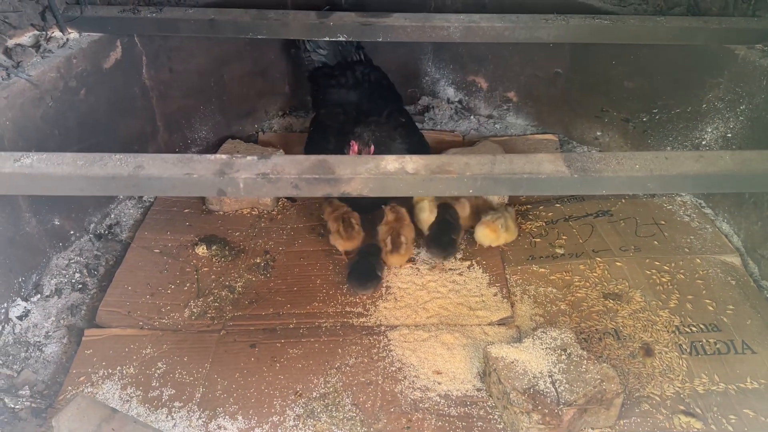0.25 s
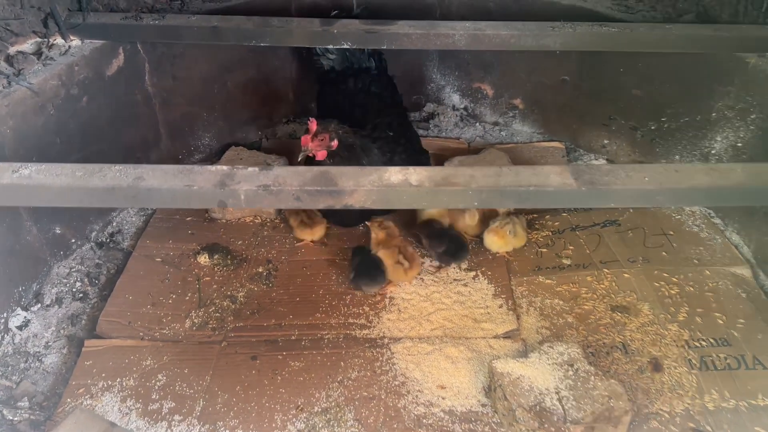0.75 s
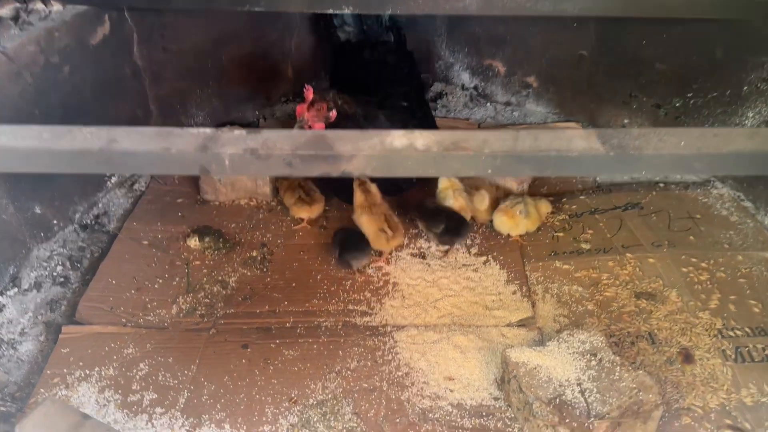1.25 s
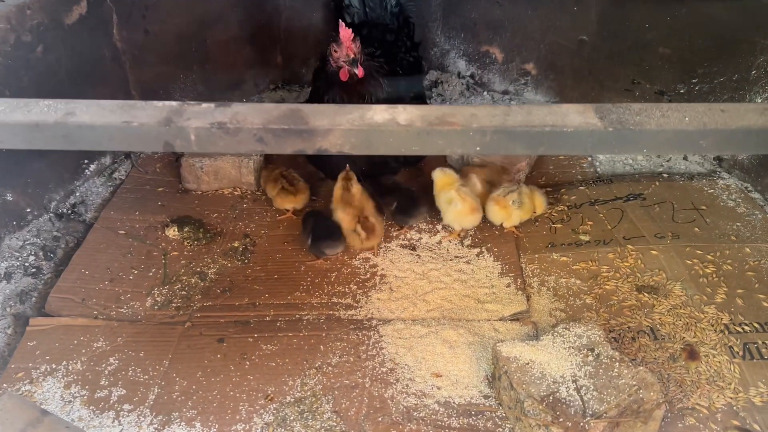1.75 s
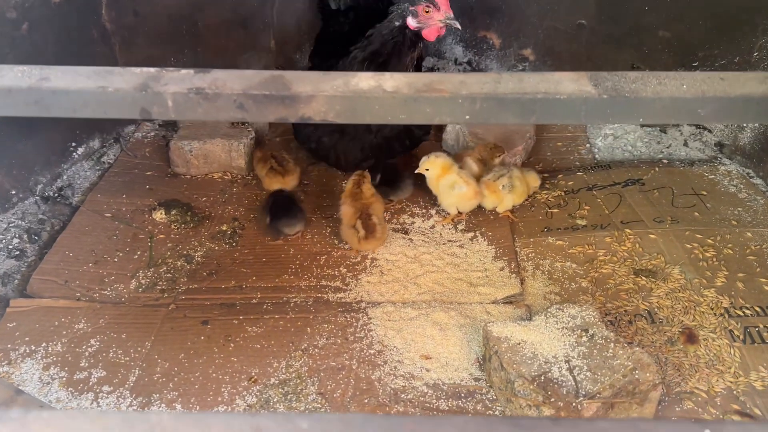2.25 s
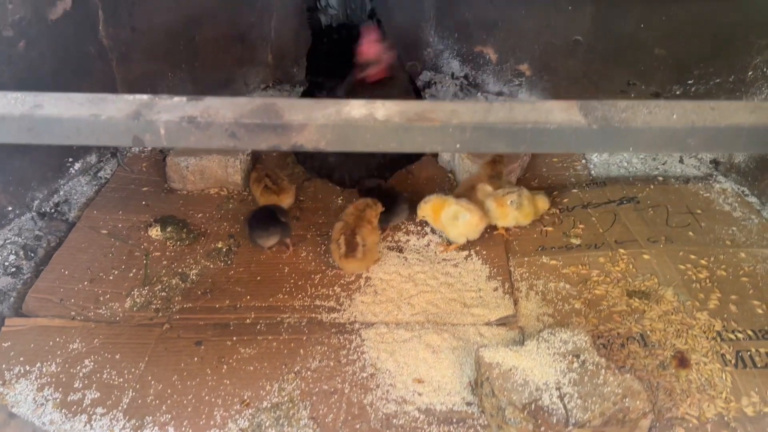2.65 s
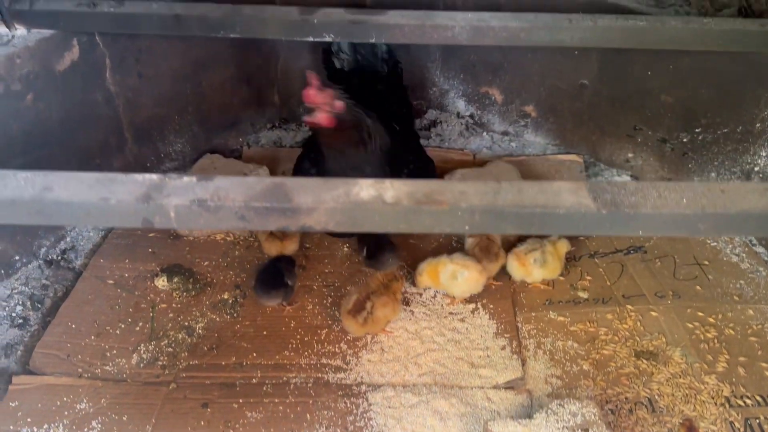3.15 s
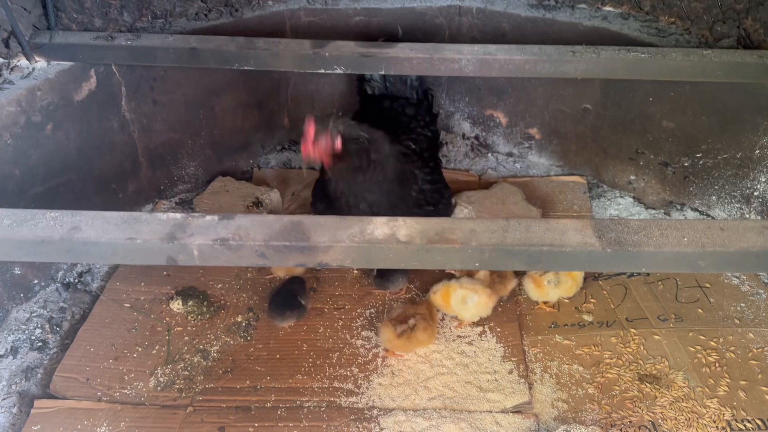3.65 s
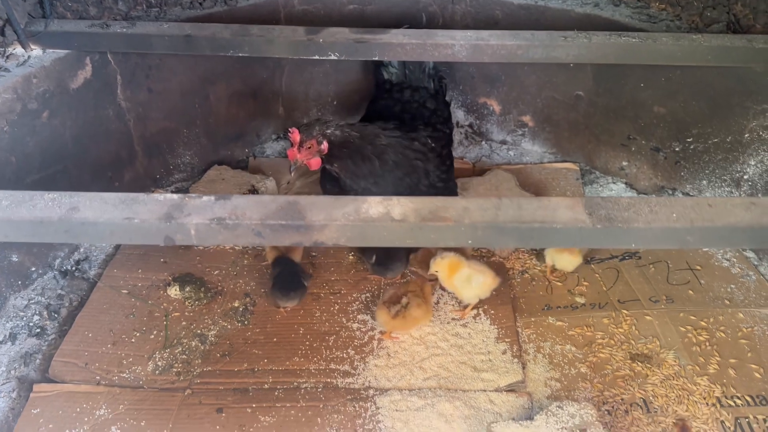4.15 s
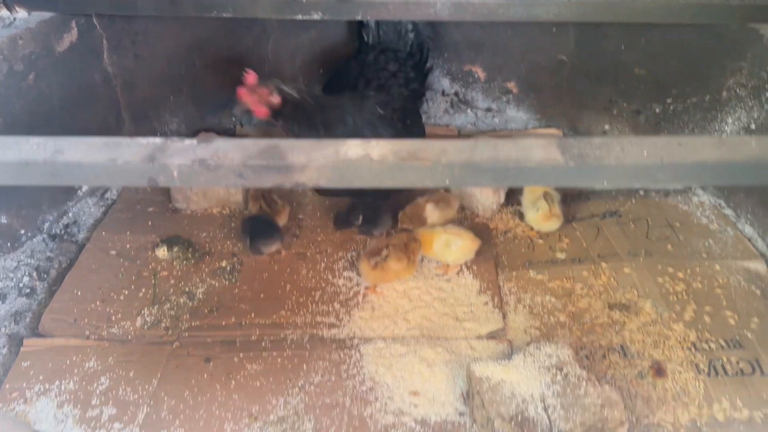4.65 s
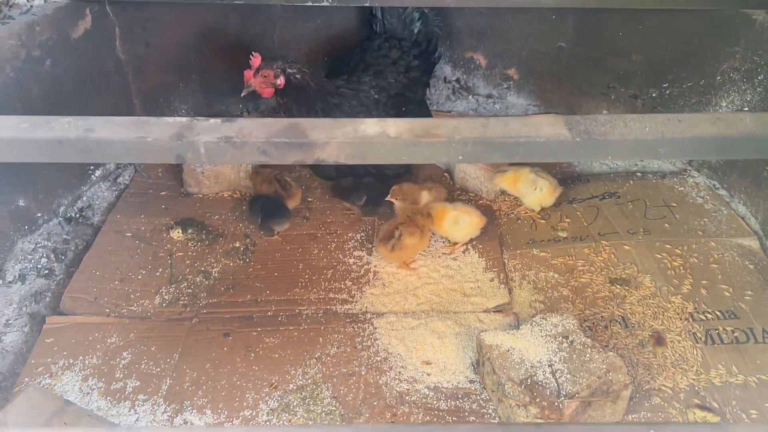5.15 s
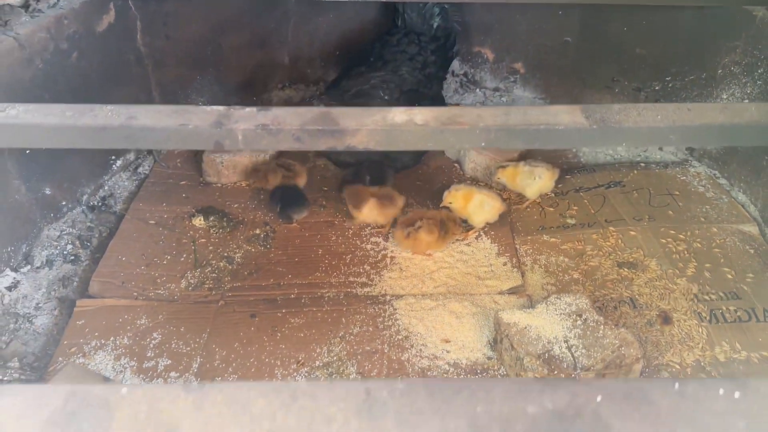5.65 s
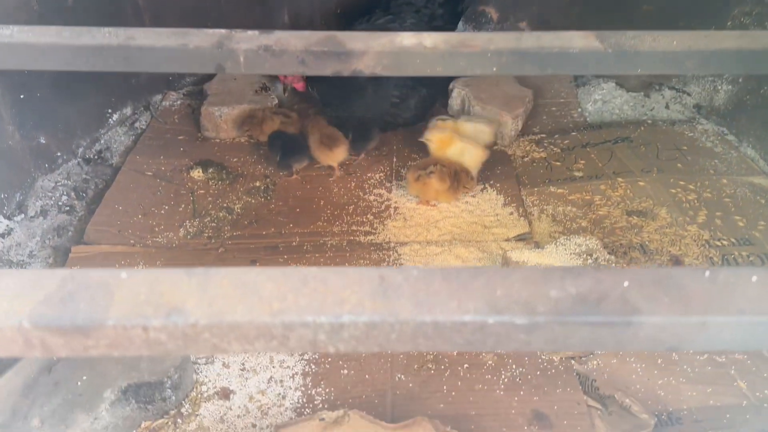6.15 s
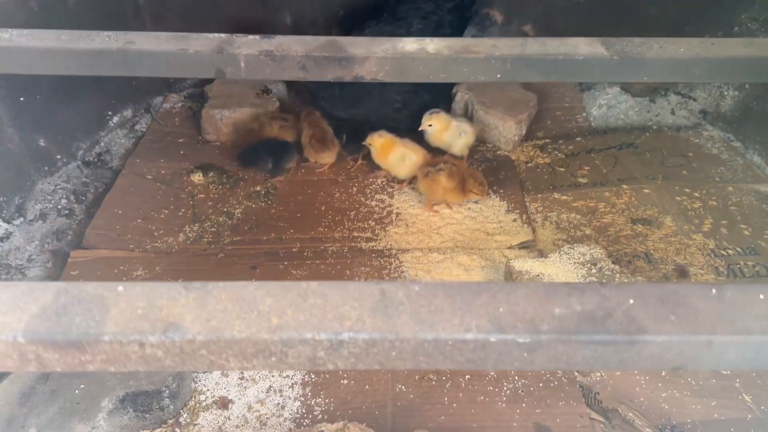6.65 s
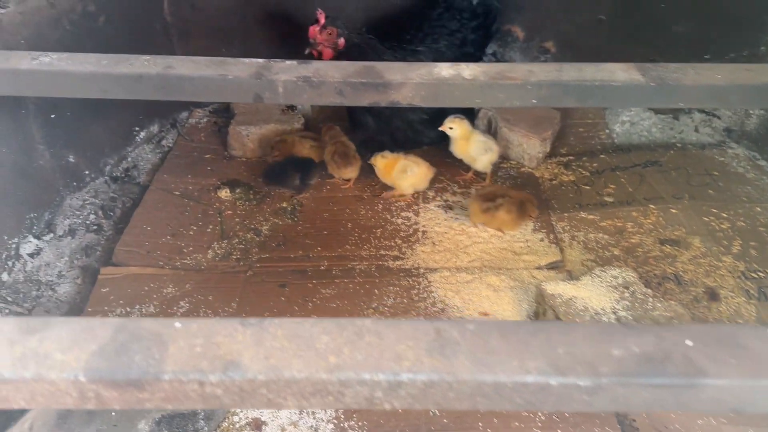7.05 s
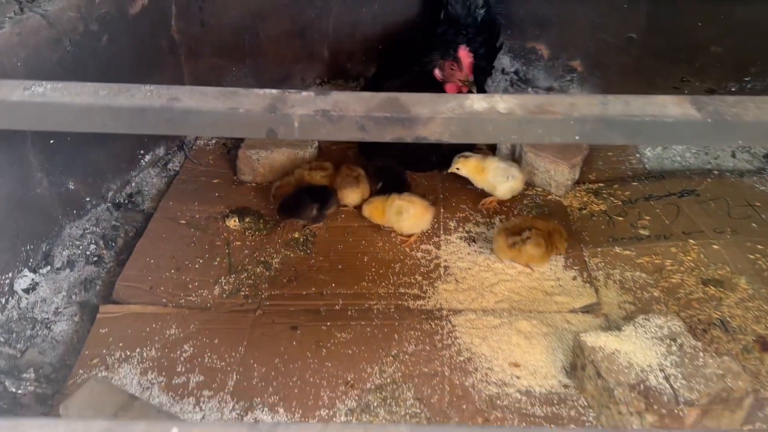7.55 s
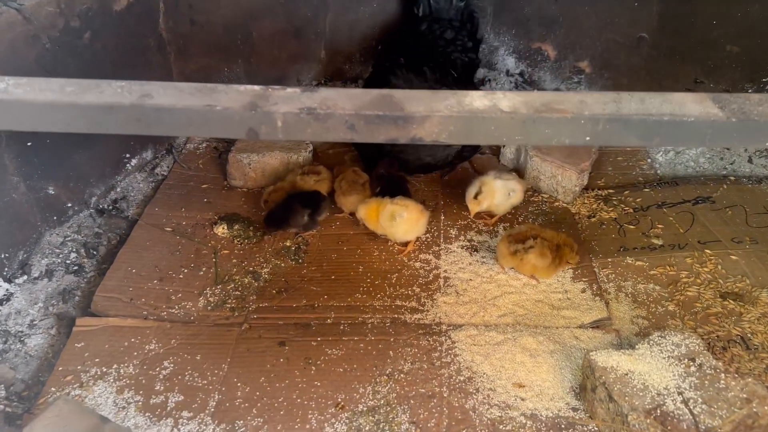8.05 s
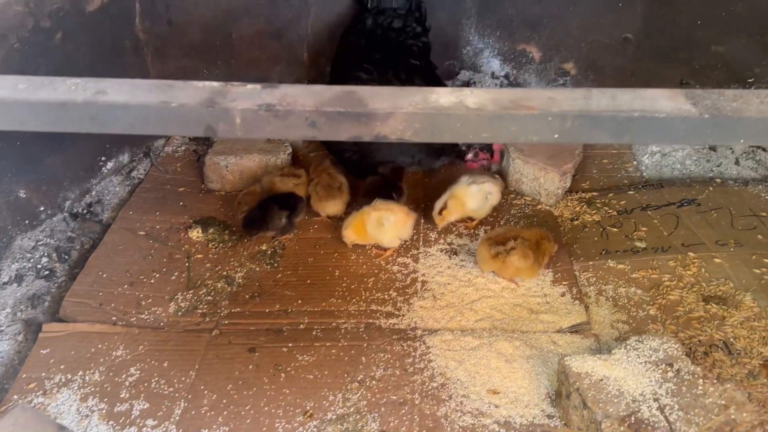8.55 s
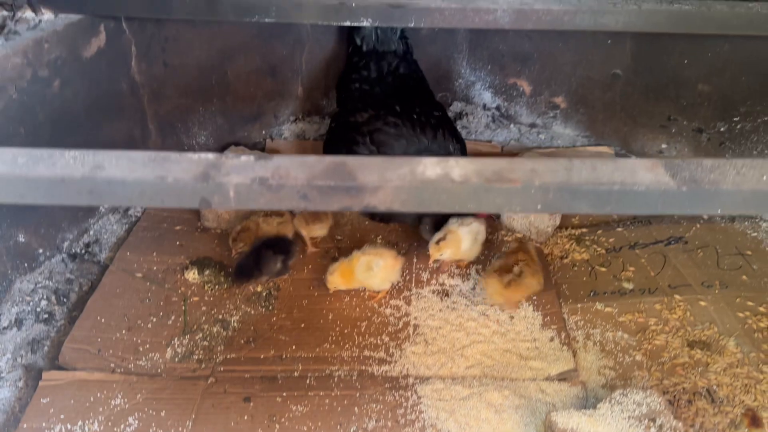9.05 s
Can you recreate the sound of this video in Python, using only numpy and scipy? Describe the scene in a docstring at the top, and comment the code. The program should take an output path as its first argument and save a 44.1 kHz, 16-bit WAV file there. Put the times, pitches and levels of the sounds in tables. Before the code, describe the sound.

Young chicks peep throughout in short, high, mostly rising whistles, heard from above an open pen. Their beaks and claws tick and scuff on dry grain, and their feet tap lightly on cardboard. From about two seconds in, a hen adds occasional soft, brief clucks. Distant traffic hisses and hums behind them, while wind rumbles on the microphone with a few low thumps, strongest near the middle.

```python
"""Far traffic hisses and hums throughout, with wind rumbling on the microphone ports (its openings).
Heard from above, beaks and claws tick and scuff on grain in an open pen floored with cardboard.
Chicks peep in short, mostly rising whistles, puffs of wind thump, and feet tap and bend the cardboard.
A hen clucks softly, her throat and chest shaping the tone. The pen's close walls add a short echo."""
import sys
import numpy as np
from scipy import signal
from scipy.fft import rfft, irfft, next_fast_len
from scipy.io import wavfile
from scipy.ndimage import uniform_filter1d

SR = 44100
rng = np.random.default_rng(int(sys.argv[2]) if len(sys.argv) > 2 else 0)


def unload_audio(sound):
    """Save the sound as a 16-bit wav file, at the path given as the first command line argument."""
    columns = np.transpose(np.atleast_2d(sound))
    # keep every value between -1 and 1, then stretch to whole-number steps
    steps = np.round(np.clip(columns, -1, 1) * 32767)
    wavfile.write(sys.argv[1], SR, steps.astype(np.int16))


N = 410130
FFT_SIZE = next_fast_len(N)
HZ = np.maximum(np.fft.rfftfreq(FFT_SIZE, 1 / SR), 1)
TICK_RISE_S = .002215

# How loud the background is: t/s, traffic level/dB, scuffing level/dB
BACKGROUND_LEVELS = [(0, -48.5, -56.5), (4, -46.5, -57), (9.3, -48, -62.5)]
# Tone of the traffic hiss: f/Hz, relative level/dB
TRAFFIC_TONE = [(150, -52), (230, -1.5), (500, 2), (1000, 2.5), (1470, 2.5), (1830, -3.5), (3400, -9),
                (6000, -11.5), (9000, -18.5)]
# Tone of the high rustle, with a narrow silent gap near 11.8 kHz, as in compressed audio:
# f/Hz, relative level/dB
RUSTLE_TONE = [(2000, 4.5), (5000, -8.5), (8400, -1), (9800, -7), (10400, -6.5), (11800, -89), (12500, -2),
               (16000, -11)]
# Wind on the ports: t/s, rumble level/dB, flutter level/dB
WIND_LEVELS = [(0, -49, -46.5), (.8, -52, -54.5), (1.2, -41.5, -50), (3.5, -48, -56.5), (4.1, -34, -38),
               (4.7, -55, -57.5), (5.6, -40.5, -49.5), (6.2, -57.5, -57), (7.2, -47.5, -53),
               (9.3, -40, -49)]
# Single puffs of wind: t/s, level/dB, f/Hz
WIND_PUFFS = [(0.876, -22, 97), (0.979, -29, 72), (3.85, -24.5, 89), (3.944, -13, 104.5),
              (3.971, -14.5, 157), (4.031, -17, 255), (4.056, -22, 148), (4.097, -21.5, 96),
              (4.377, -24, 99.4), (4.407, -21.5, 81), (5.807, -21.5, 100.5), (5.886, -21, 194),
              (5.915, -20.5, 183)]
# A far engine coming and going: t/s, level/dB
ENGINE_LEVELS = [(0, -63), (1, -46), (2.3, -55), (4.6, -50.5), (5.4, -44.5), (5.9, -39.5), (6.1, -57),
                 (6.8, -41), (7.6, -46), (8.2, -61)]
# The engine's tones: multiple of its pitch, relative level/dB
ENGINE_TONES = [(1, 0.5), (2, -12)]
# Beaks and claws hitting dry grain: t/s, level/dB, woody body against the treble/dB
GRAIN_TICKS = [(0.1018, -46, 7), (0.254, -38, -13), (0.9627, -35, -3), (0.9767, -32.5, -4.5),
               (1.0076, -23.5, -19), (1.1038, -26, -6), (1.279, -37.5, 3), (1.3697, -33, -4.5),
               (1.4163, -16, -17), (1.4608, -33, -7), (1.503, -32.5, -16), (1.9172, -22.5, -19),
               (2.0243, -37.5, 1), (2.0519, -29, -26), (2.2624, -36, -4), (2.11, -41, -26),
               (3.183, -27, -29), (3.362, -40, 0), (3.4233, -22.5, -13.5), (3.8376, -39.5, -2),
               (4.3285, -32.5, 1), (4.4205, -39, 5.5), (5.1303, -31.5, -4), (5.1923, -36.5, 0),
               (6.332, -32.5, -2), (6.795, -33, -13.5), (7.5948, -35, -2), (8.246, -28, -33),
               (8.6646, -21, -11), (8.7429, -30.5, -1.5), (8.791, -45, 10), (8.985, -35, -1),
               (9.001, -30, -6), (9.158, -33, -14)]
# Tone of the grain's crackle: f/Hz, relative level/dB
GRAIN_TONE = [(700, 6), (2000, 13.5), (4500, -2), (8500, 1), (11000, -10), (14500, -2), (16500, -4)]
# Claws dragged through the grain: t/s, level/dB, length/s
CLAW_DRAGS = [(0.953, -46, 0.093), (5.125, -46, 0.02), (8.47, -49, 0.3), (8.908, -46, 0.22)]
# Notes of pecked cardboard: f/Hz, woody body that rings it most/dB, time to fade by 60 dB/s
BOARD_NOTES = [(1100, 9, .035), (2100, -2, .04), (4400, -10, .025)]
# Peeps, each an opening that turns into a sweep: turn t/s, opening length/s, start f/Hz, turn f/Hz,
# tip f/Hz, sweep length/s, opening level/dB, sweep level/dB
CHICK_PEEPS = [(0.154, 0.024, 3250, 3370, 4380, 0.027, -50, -48),
               (0.295, 0.024, 3200, 3340, 3860, 0.014, -45.3, -46),
               (0.386, 0.029, 3100, 3600, 5080, 0.02, -44, -48),
               (0.6, 0.024, 3780, 3440, 3170, 0.007, -51, -50),
               (0.663, 0.051, 3300, 3810, 5000, 0.014, -51, -42),
               (0.865, 0.026, 3050, 2760, 4860, 0.024, -44, -39.5),
               (1.023, 0.024, 3120, 3000, 3820, 0.021, -54, -45),
               (1.185, 0.016, 3280, 3500, 5450, 0.051, -53, -45.5),
               (1.431, 0.033, 3660, 3770, 4970, 0.024, -49.5, -45),
               (1.594, 0.036, 4030, 3580, 3320, 0.008, -47.5, -54),
               (1.703, 0.04, 3080, 2660, 4940, 0.027, -45.5, -40.5),
               (1.881, 0.053, 3420, 3080, 4370, 0.031, -52.5, -44.5),
               (2.013, 0.026, 3710, 3170, 4290, 0.025, -44.5, -50),
               (2.069, 0.016, 3080, 3180, 3700, 0.018, -52, -50),
               (2.494, 0.025, 3050, 3020, 5350, 0.038, -43, -47.5),
               (2.738, 0.036, 3750, 3630, 5160, 0.02, -50.5, -51),
               (2.768, 0.028, 3450, 3260, 5130, 0.035, -42.5, -47),
               (2.8, 0.016, 2500, 2540, 4290, 0.028, -49, -47.5),
               (2.864, 0.035, 3010, 2660, 4780, 0.028, -41.5, -38),
               (2.882, 0.033, 4100, 3460, 3280, 0.005, -46.5, -45),
               (3.022, 0.024, 4200, 3530, 4800, 0.032, -46.5, -56),
               (3.036, 0.036, 4340, 3310, 3330, 0.005, -48.5, -50.0),
               (3.227, 0.038, 4400, 3490, 3290, 0.006, -53, -52.4),
               (3.256, 0.013, 2900, 2910, 4850, 0.028, -51, -43),
               (3.384, 0.037, 3460, 3050, 4880, 0.021, -46, -38),
               (3.425, 0.006, 2930, 2930, 4850, 0.039, -52, -52),
               (3.563, 0.039, 3380, 3740, 4790, 0.016, -50, -47.5),
               (3.6, 0.0036, 2380, 2430, 4650, 0.042, -51.8, -43),
               (3.625, 0.0036, 2480, 2440, 4260, 0.038, -42, -46),
               (3.715, 0.003, 2700, 2800, 5000, 0.039, -47, -45),
               (4.069, 0.017, 3010, 3630, 5000, 0.02, -46, -43.5),
               (4.293, 0.03, 3370, 3280, 5350, 0.04, -45, -49.5),
               (4.423, 0.003, 2510, 2550, 4290, 0.016, -49, -42),
               (4.708, 0.033, 3210, 2880, 4790, 0.028, -42.5, -39.5),
               (4.753, 0.022, 2950, 3210, 5040, 0.033, -53, -49),
               (4.77, 0.003, 2750, 3080, 4100, 0.038, -56, -46.5),
               (4.915, 0.031, 3490, 3430, 4870, 0.021, -41, -42.5),
               (5.049, 0.035, 3710, 3080, 4200, 0.027, -54, -50),
               (5.276, 0.0035, 2450, 2380, 4640, 0.039, -38, -46),
               (5.494, 0.032, 3200, 2850, 4870, 0.028, -43, -37),
               (5.543, 0.008, 3040, 3180, 4290, 0.023, -42, -53),
               (5.693, 0.031, 2860, 3230, 5130, 0.039, -50, -54),
               (5.762, 0.013, 3380, 3660, 4930, 0.012, -51, -47.5),
               (5.785, 0.044, 3450, 3010, 5330, 0.016, -40.5, -41),
               (5.856, 0.029, 2760, 3750, 4110, 0.013, -45.5, -47),
               (6.014, 0.023, 4000, 3280, 3300, 0.005, -51, -47),
               (6.027, 0.005, 2120, 2960, 4330, 0.024, -43, -49),
               (6.355, 0.006, 2320, 2620, 3920, 0.018, -51, -41.5),
               (6.439, 0.026, 2960, 2910, 4280, 0.017, -46, -41.5),
               (6.569, 0.044, 4370, 3030, 4080, 0.022, -54.5, -47),
               (6.667, 0.033, 4500, 3180, 3500, 0.017, -55, -44),
               (6.671, 0.027, 3330, 3410, 5010, 0.033, -55, -45.5),
               (6.91, 0.013, 2900, 3220, 4240, 0.019, -46.5, -52),
               (7.225, 0.0033, 2810, 3000, 4900, 0.014, -42, -47),
               (7.412, 0.0052, 3300, 3620, 4780, 0.042, -47, -55),
               (7.454, 0.041, 3050, 2760, 4160, 0.019, -46, -43.5),
               (7.528, 0.014, 2900, 2910, 4130, 0.01, -49, -47),
               (7.645, 0.025, 3430, 3140, 4460, 0.04, -44.5, -43),
               (7.659, 0.017, 3030, 2810, 4370, 0.037, -40, -40),
               (7.816, 0.024, 2890, 3300, 5160, 0.022, -45, -54),
               (7.955, 0.037, 3520, 3280, 5100, 0.023, -45.5, -48.5),
               (8.376, 0.003, 2580, 2400, 4320, 0.037, -41, -41),
               (8.428, 0.0033, 3180, 3490, 5060, 0.023, -47, -49),
               (8.571, 0.022, 2530, 2910, 5250, 0.041, -40.5, -47),
               (9.07, 0.03, 3150, 3550, 5060, 0.022, -52, -44.5)]
# Feet on the cardboard: t/s, level/dB
FOOT_TAPS = [(0.976, -40), (1.103, -35.5), (1.115, -37), (2.561, -38), (2.592, -38.5), (2.946, -42),
             (3.298, -36), (3.7, -45.5), (4.276, -36), (6.33, -41), (6.795, -42), (7.596, -38), (8.13, -41),
             (8.398, -42), (9.192, -42)]
# The hen's clucks and squeaks: t/s, level/dB, length/s, voice f/Hz, throat f/Hz
HEN_CALLS = [(2.045, -30, 0.013, 429, 820), (2.504, -27.5, 0.019, 297, 750), (2.519, -22, 0.014, 434, 830),
             (2.55, -42, 0.015, 1310, 1350), (3.123, -30, 0.019, 293, 810),
             (3.168, -28.5, 0.024, 278.5, 810), (4.024, -28.5, 0.024, 287, 760),
             (4.235, -34, 0.013, 370, 710), (4.486, -21.5, 0.023, 340, 740),
             (4.501, -28.5, 0.015, 490, 870), (4.52, -42, 0.016, 1400, 1400),
             (4.543, -28.5, 0.0088, 360, 770), (5.782, -28.5, 0.013, 348, 696),
             (5.791, -31.5, 0.029, 910, 970), (6.843, -32, 0.047, 249, 750), (7.364, -27, 0.028, 351, 710),
             (7.392, -44, 0.017, 1380, 1400), (9.266, -27.5, 0.038, 300, 740)]
# How alike the noise is on both sides: f/Hz, likeness (1 = the same)
STEREO_LIKENESS = [(50, 0.44), (250, 0.51), (1000, 0.059), (4000, 0.03), (8000, 0.28), (15000, 1)]
# How much louder the left port is than the right: f/Hz, level/dB
LEFT_LOUDER = [(60, 1), (700, -2), (2400, 1.5), (3500, -0.9), (5000, 6.5), (8000, 3.5), (15000, -3.5)]
# How far the left port is ahead (below 0 = behind): f/Hz, phase/rad
LEFT_AHEAD = [(0, 0), (260, -.2), (1720, -3.1), (4050, -6), (5860, -5.3), (7410, -4.4), (8100, -6.5),
              (9470, -7), (10300, -9.4), (13400, -12.4), (16400, -12.8)]


def from_db(db):
    """Turn decibels into a number to multiply by."""
    return 10 ** (np.asarray(db) / 20)


def rms_one(x):
    """Scale a signal so its average strength (rms) is 1."""
    return x / np.sqrt(np.mean(x ** 2) + 1e-20)


def in_time(rows):
    """Join a table's points with straight lines, one curve for each level column."""
    times, *columns = np.transpose(rows)
    return [np.interp(np.arange(N) / SR, times, column) for column in columns]


def spectrum(points):
    """Read a table at every frequency, with octaves evenly spaced."""
    hz, values = np.transpose(points)
    return np.interp(np.log(HZ), np.log(hz), values)


def drift(rate_hz):
    """A smooth random wobble, about 1 in size."""
    pole = np.exp(-80 * np.pi * rate_hz / SR)
    white = rng.standard_normal(N // 40 + 2002)   # one value per 40 samples
    slow = signal.lfilter([1], [1, -2 * pole, pole * pole], white)[2000:]
    return np.interp(np.arange(N) / 40, np.arange(len(slow)), rms_one(slow))


def add(out, s, sound):
    """Mix a short sound into a track, starting s seconds in."""
    i = round(s * SR)
    out[:, i:i + sound.shape[-1]] += sound[..., :N - i]


def coloured(x, gain):
    """Turn each frequency up or down by its own gain."""
    return irfft(rfft(x, FFT_SIZE) * gain, FFT_SIZE)[..., :N]


def stereo_white():
    """Even hiss, with left and right more alike at some frequencies than at others."""
    mid, side = rng.standard_normal((2, N))
    alike = np.clip(spectrum(STEREO_LIKENESS), 0, 1)
    return coloured(mid, np.sqrt(1 + alike)) + coloured(side, np.sqrt(1 - alike)) * [[1], [-1]]


def patchy_noise(tone, swell_db, rate_hz):
    """Noise whose octaves swell partly together, partly alone."""
    out, together = 0, drift(rate_hz)
    faded_ends = [(tone[0][0] / 2, -60), *tone, (SR / 2, -90)]
    whole = rfft(stereo_white(), FFT_SIZE) * from_db(spectrum(faded_ends))
    for octave in range(9):
        band = np.maximum(0, 1 - abs(np.log2(HZ / 80) - octave))
        swell = from_db(swell_db * (together + .39 * drift(rate_hz)))
        out = out + irfft(whole * band, FFT_SIZE)[:, :N] * swell
    return rms_one(out)


def traffic():
    """Far traffic blends into a gently wavering hiss."""
    level_db, _ = in_time(BACKGROUND_LEVELS)
    return from_db(level_db) * patchy_noise(TRAFFIC_TONE, swell_db=2, rate_hz=39)


def scuffing():
    """Beaks and claws rub on the grain, making a high, patchy rustle."""
    _, level_db = in_time(BACKGROUND_LEVELS)
    return from_db(level_db) * patchy_noise(RUSTLE_TONE, swell_db=4.5, rate_hz=31.5)


def wind(puff_cycles=2.6, wake_fade_s=.14):
    """Wind makes lumpy low noise on the ports, and each puff hits the two a little differently."""
    rumble_db, flutter_db = in_time(WIND_LEVELS)
    rumble_gain = from_db(spectrum([(22, -57), (45, 30.5), (65, 25.5), (100, -24), (300, -85)]))
    flutter_gain = from_db(spectrum([(50, -19), (90, 7), (180, 3.5), (260, -5), (2000, -57.5)]))
    rumble = rms_one(coloured(stereo_white(), rumble_gain))
    flutter = rms_one(coloured(stereo_white(), flutter_gain))
    gusts = np.zeros((1, N))
    wake = from_db(-60 * np.arange(0, .15, 1 / SR) / wake_fade_s)
    for s, db, _ in WIND_PUFFS:
        add(gusts, s, from_db(db - 8) * wake)   # swirling air trails every puff
    gusts = uniform_filter1d(gusts, size=400)
    out = from_db(rumble_db) * rumble + (from_db(flutter_db + 3.8 * drift(6.3)) + gusts) * flutter
    for (s, db, hz), (start, skew) in zip(WIND_PUFFS, rng.uniform(-1.49, 1, (len(WIND_PUFFS), 2))):
        progress = np.linspace(0, 1, round(puff_cycles / hz * SR))
        phase = 2 * np.pi * puff_cycles * progress + np.pi * start + skew * np.array([[1], [-1]])
        puff = np.sin(phase) + .27 * np.sin(2.82 * phase)   # a steep front adds a higher tone
        add(out, s, from_db(db) * np.sin(np.pi * progress ** .7) * puff)
    return out


def engine(pitch_hz=83.9):
    """A far idling engine hums with two low tones that waver a little."""
    level_db = in_time(ENGINE_LEVELS)[0]
    phase = 2 * np.pi * np.cumsum(pitch_hz * (1 + .01985 * drift(1.504))) / SR
    return sum(from_db(level_db + db + 2.06 * drift(8.2)) * np.sin(k * phase) for k, db in ENGINE_TONES)


def grain(crack_fade_s=.017, body_rise_s=.0027, body_fade_s=.027, body_top_hz=5600, faint_count=160):
    """Struck grain gives a dry crack over a slower woody crunch; dragged claws give a longer scratch."""
    crack_level, body_level = np.zeros((2, 1, N))
    t = np.arange(0, .06, 1 / SR)
    crack = from_db(-60 * np.maximum(t - TICK_RISE_S, 0) / crack_fade_s) * np.minimum(1, t / TICK_RISE_S)
    crunch = from_db(-60 * np.maximum(t - body_rise_s, 0) / body_fade_s) * np.minimum(1, t / body_rise_s)
    faint_times = rng.uniform(0, N / SR, faint_count)
    faint_db = -48.5 + 2.5 * rng.exponential(1, faint_count).clip(0, 2.2)
    faint_ticks = [(s, db, 2) for s, db in zip(faint_times, faint_db)]   # 2 dB of woody body
    for s, db, body_db in [*GRAIN_TICKS, *faint_ticks]:
        add(crack_level, s, from_db(db) * crack)
        add(body_level, s, from_db(db + body_db) * crunch)
    for s, db, length in CLAW_DRAGS:
        for track in crack_level, body_level:
            add(track, s, from_db(db) * np.hanning(round(length * SR)) ** .5)
    crackle = rms_one(coloured(rng.standard_normal(N), from_db(spectrum(GRAIN_TONE))))
    low = coloured(crackle, 1 / (1 + (HZ / body_top_hz) ** 4))
    return (crack_level * (crackle - low) + body_level * low) * from_db(4.05 * drift(170))


def cardboard(ring_db=-8):
    """Pecks make the cardboard ring briefly: the woodier the peck, the lower its strongest note."""
    out, t = np.zeros((1, N)), np.arange(0, .05, 1 / SR)
    hz, best_body_db, fade_s = np.transpose(BOARD_NOTES)[:, :, None]
    chance = rng.uniform(-1, 1, (len(GRAIN_TICKS), 2, len(BOARD_NOTES), 1))
    for (s, db, body_db), (strength, detune) in zip(GRAIN_TICKS, chance):
        levels = from_db(-abs(body_db - best_body_db) + 2 * strength - 60 * t / fade_s)
        notes = levels * np.sin(2 * np.pi * hz * (1 + .1 * detune) * t)
        knock_db = db + max(body_db, 0) + min(body_db + 5, 0) + ring_db   # thin ticks barely knock
        add(out, s + TICK_RISE_S / 2, from_db(knock_db) * notes.sum(axis=0))
    return out


def chicks(rise_s=.0055, beak_hz=4200, beak_width_hz=800, beak_db=5, tip_db=-10):
    """Each peep is a trembling whistle, mostly sweeping up, that swells near the beak's own note."""
    out = np.zeros((2, N))
    tremble = from_db(2.2 * drift(160) + 2.2 * drift(40))
    waver = 1 + .01 * drift(120)
    hook = .4   # past the tip, the pitch bends back and fades for this share of the sweep's length
    for peep, place in zip(CHICK_PEEPS, rng.uniform(-.22, 1, len(CHICK_PEEPS))):
        turn, opening, start_hz, turn_hz, tip_hz, sweep, opening_db, sweep_db = peep
        t = np.arange(turn - opening, turn + sweep * (1 + hook), 1 / SR)
        progress = np.maximum(t - turn, 0) / sweep   # 0 up to the turn, 1 at the tip
        hz = np.interp(t, [t[0], turn], [start_hz, turn_hz])
        hz += (tip_hz - turn_hz) * np.sin(np.pi / 2 * progress) ** 1.4
        boost_db = beak_db / (1 + (2 * (hz - beak_hz) / beak_width_hz) ** 2)
        level_db = np.interp(progress, [0, .3, 1], [opening_db, sweep_db, sweep_db + tip_db])
        fades = np.minimum(1, (t - t[0]) / rise_s) * np.clip((1 + hook - progress) / hook, 0, 1)
        phase = 2 * np.pi * np.cumsum(hz * waver[(t * SR).astype(int)]) / SR
        side_shift = .4 * place * np.array([[1], [-1]])   # the chicks stand apart
        add(out, t[0], from_db(level_db + boost_db) * fades * np.sin(phase + side_shift))
    return out * tremble


def feet(from_hz=1345, to_hz=230, fall_s=.00338, peak_s=.0094):
    """A soft tap bends the cardboard; high ripples arrive first, so the rough thud drops in pitch."""
    out, t = np.zeros((2, N)), np.arange(0, .05, 1 / SR)
    swell = t / peak_s * np.exp(.5 - .5 * (t / peak_s) ** 2)
    falling_hz = to_hz + (from_hz - to_hz) * np.exp(-t / fall_s)
    thud_band = signal.butter(2, [200, 900], "band", fs=SR, output="sos")
    noise = rms_one(signal.sosfilt(thud_band, rng.standard_normal(N)))
    for (s, db), (detune, start) in zip(FOOT_TAPS, rng.uniform(-1.12, 1, (len(FOOT_TAPS), 2))):
        hz = falling_hz * (1 + .12 * detune)
        ripple = swell * np.sin(2 * np.pi * np.cumsum(hz) / SR + np.pi * start)
        thud = .45 * np.sqrt(swell) * np.resize(noise[round(s * SR):], len(t))
        add(out, s, from_db(db) * (ripple + thud))
    return out


def hen(pitch_rise=.2, throat_width_hz=336, chest_hz=227, chest_width_hz=84, chest_db=4.5):
    """A cluck is a short, raspy, rising buzz; throat and chest favour the tones near their own notes."""
    out = np.zeros((2, N))
    rasp, jitter = 1 + .35 * drift(200), 1 + .015 * drift(100)
    multiples = np.arange(1, 7)[:, None]
    for s, db, length, pitch_hz, throat_hz in HEN_CALLS:
        progress = np.linspace(0, 1, round(length * SR))
        unsteady = np.resize(jitter[round(s * SR):], len(progress))
        phase = 2 * np.pi * np.cumsum(pitch_hz * unsteady * (1 + pitch_rise * (progress - .5))) / SR
        tones_hz = multiples * pitch_hz
        throat = 1 / (1 + 2j * (tones_hz - throat_hz) / throat_width_hz) ** 1.47   # also delays tones
        chest = from_db(chest_db) / (1 + (2 * (tones_hz - chest_hz) / chest_width_hz) ** 2)
        buzz = np.sum((throat + chest) * np.exp(1j * multiples * phase), axis=0).real
        cluck = buzz * abs(np.sin(np.pi * progress)) ** .94
        add(out, s, from_db(db) * cluck / abs(cluck).max())
    return out * rasp


def pen(x, echo_s=.009, echo_db=-18, tail_s=.12, tail_db=-10):
    """The nearest wall sends back one echo, and the close walls together add a short tail."""
    t = np.arange(0, tail_s, 1 / SR)
    bounces = rng.standard_normal((2, len(t))) * from_db(-60 * t / tail_s) * (t > .002)
    bounces /= np.sqrt(np.sum(bounces ** 2, axis=1, keepdims=True))
    tail = signal.fftconvolve(x, bounces, axes=1)[:, :N]
    echo = np.pad(x, [(0, 0), (round(echo_s * SR), 0)])[:, :N]
    return x + from_db(echo_db) * echo + from_db(tail_db) * tail


def ports(x):
    """The left port hears the sound later and brighter than the right."""
    lead = np.interp(HZ, *np.transpose(LEFT_AHEAD))
    half = from_db(spectrum(LEFT_LOUDER) / 2) * np.exp(.5j * lead)   # each side takes half
    return coloured(x, [half, 1 / half])


def scene():
    """Birds in the pen, traffic and wind around it; the hen is equally far from both ports."""
    background = scuffing() + traffic()
    birds = pen(chicks() + grain() + cardboard() + feet())
    return ports(birds + background) + pen(hen()) + wind() + engine()


def record(dry, bass_hz=30, top_hz=16800):
    """Cut away the deepest bass and the highest treble."""
    dry = signal.sosfilt(signal.butter(2, bass_hz, "high", fs=SR, output="sos"), dry)
    return signal.sosfilt(signal.cheby2(14, 80, top_hz, fs=SR, output="sos"), dry)


dry = scene()
out = record(dry)
unload_audio(out)
```